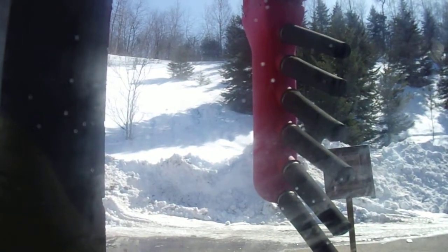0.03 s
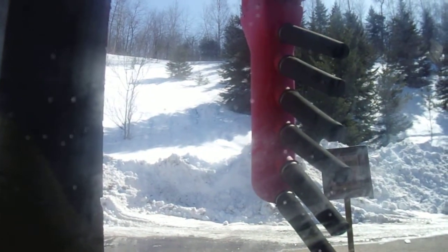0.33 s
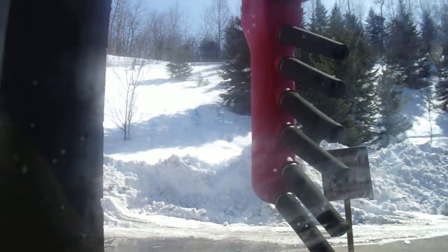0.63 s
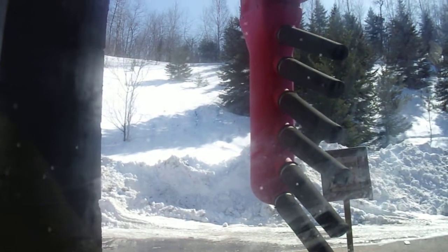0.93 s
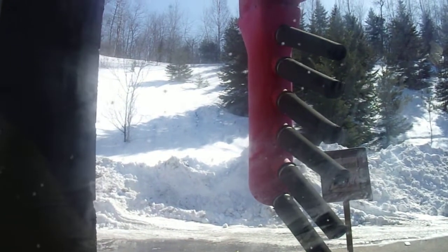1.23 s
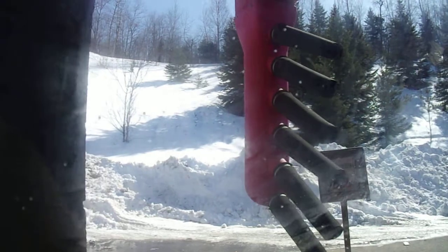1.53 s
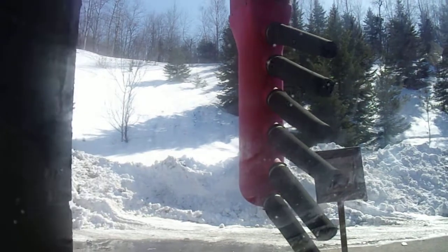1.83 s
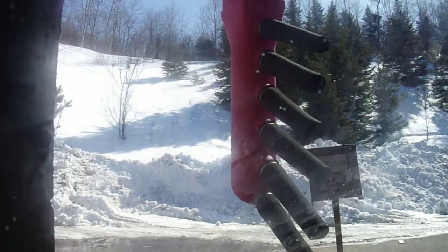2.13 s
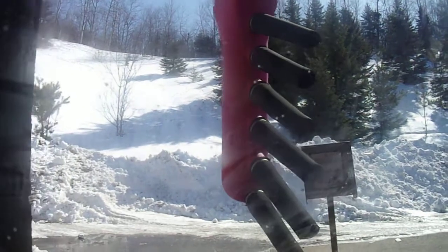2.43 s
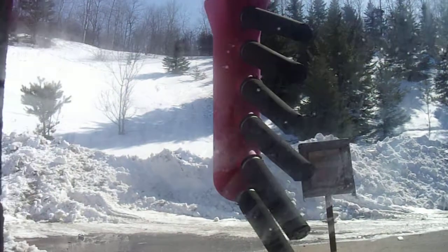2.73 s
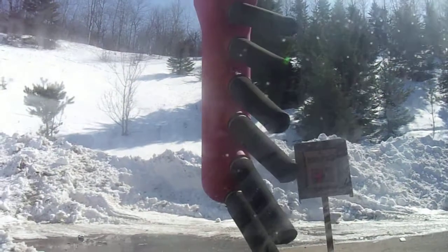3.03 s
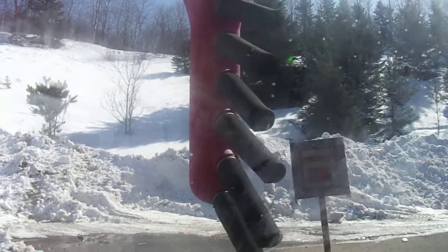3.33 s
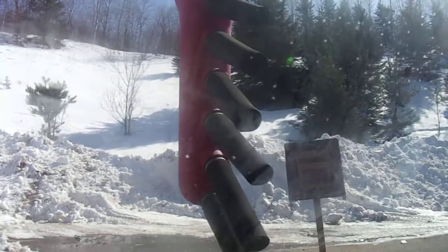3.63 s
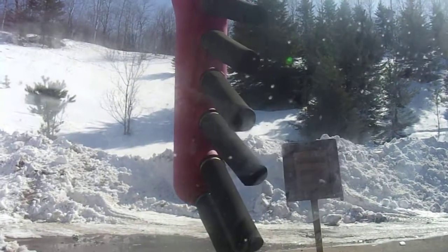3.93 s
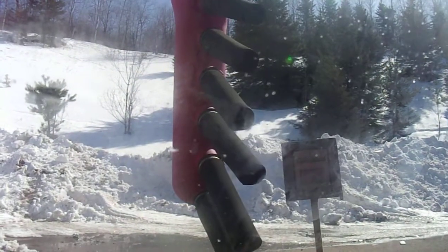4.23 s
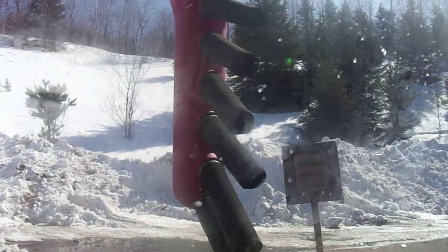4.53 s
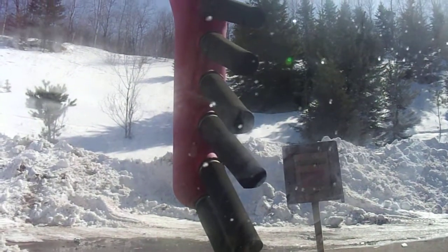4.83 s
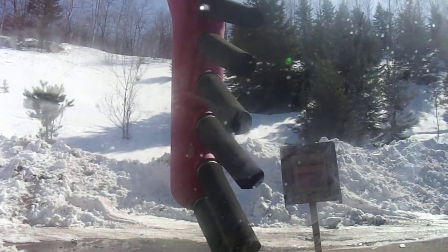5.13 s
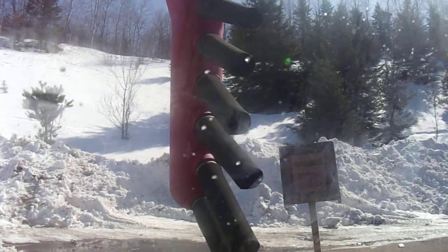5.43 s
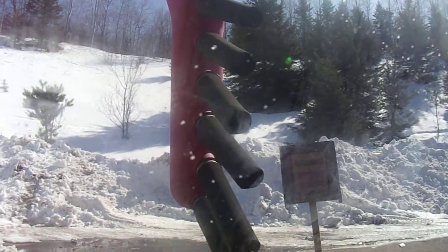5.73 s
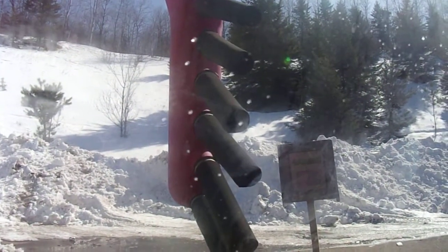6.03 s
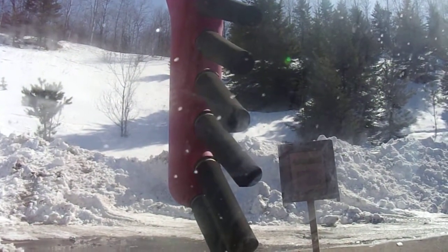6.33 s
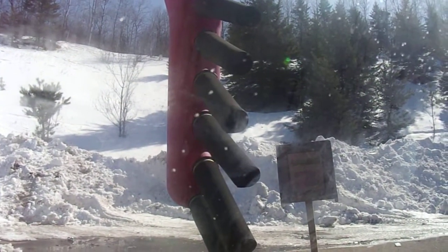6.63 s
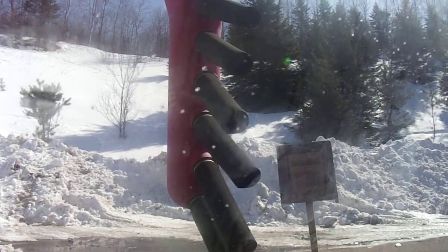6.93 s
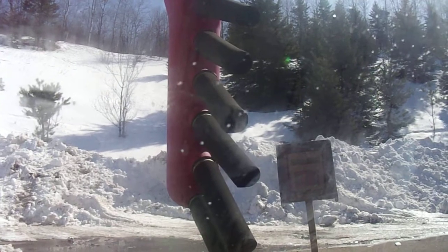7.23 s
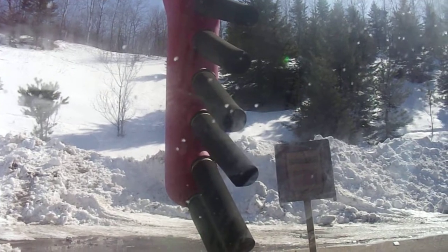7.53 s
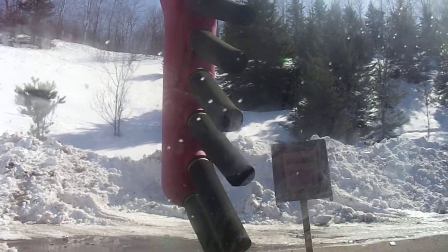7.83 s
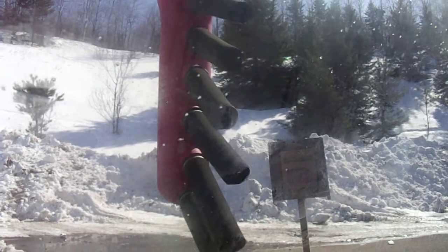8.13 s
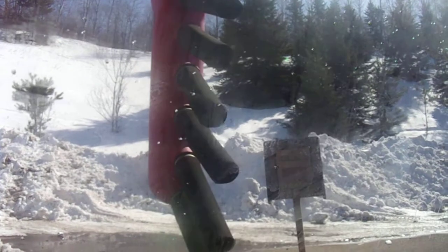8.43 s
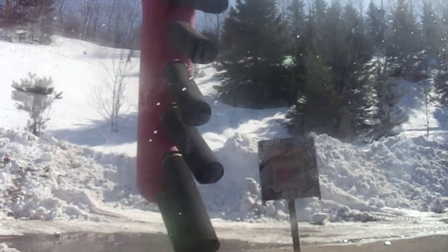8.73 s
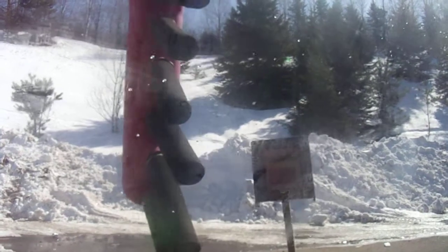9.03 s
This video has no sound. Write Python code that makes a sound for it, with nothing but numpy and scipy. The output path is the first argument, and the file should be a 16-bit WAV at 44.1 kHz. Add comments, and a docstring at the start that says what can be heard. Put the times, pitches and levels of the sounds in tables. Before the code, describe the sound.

Air jets roar and rumble over a car in a car wash dryer, with water drops tapping the roof and spray hissing on glass.

```python
"""Inside a car under the dryer of a car wash. Turbulent air jets drum on the body and roar round it,
while the fan hums behind them. At first heavy drops strike the roof and excite its modes; then the jets
move from the bonnet to the windscreen, whistle in a seal and drive a fine spray over the glass.
A small microphone overloads on the rumble, passes little treble and clicks once."""
import sys
import numpy as np
from scipy import signal
from scipy.fft import rfft, irfft, next_fast_len
from scipy.io import wavfile
from scipy.ndimage import uniform_filter1d, map_coordinates

SR = 44100
rng = np.random.default_rng(int(sys.argv[2]) if len(sys.argv) > 2 else 0)


def transcribe(u):
    """Save the signal u as a 16-bit wav file named by the first command-line argument.

    u: samples, shape (n,) or (channels, n), limited to [-1, 1]; the rate is SR.
    q: integer samples, one column per channel.
    """
    v = np.clip(np.atleast_2d(u).T, -1, 1)
    q = np.round(v * 32767).astype(np.int16)
    wavfile.write(sys.argv[1], SR, q)


N = 410130

# Fan tone and duct resonances. Each row: centre in Hz, half-width in Hz, level in dB with the jets on
# the bonnet, level in dB with the jets on the windscreen.
FAN_TONES = [(524.2, 9, -39.5, -37), (1207, 35, -72, -53.5), (3530, 70, -55.5, -56)]
# Puffs of air through a door seal. Each row: start in seconds, length in seconds, pitch in Hz, level in dB.
SEAL_PUFFS = [(3.57, .15, 1501, -32), (3.72, .28, 1502, -34.5), (4.02, .2, 1563, -48),
              (4.44, .15, 1562, -43.5)]
# Modes of the roof panel. Each row: frequency in Hz, relative level in dB, time to fall 60 dB in seconds.
ROOF_MODES = [(355, 3.5, 0.1), (454, 13, 0.027), (667, 8, 0.047), (800, -6.5, 0.024), (1066, 0, 0.058),
              (1200, -7, 0.034), (1400, -11, 0.036), (1550, -7, 0.062), (1856, -13.5, 0.06),
              (2166, -12, 0.045), (2400, -16.5, 0.0083), (3350, -18, 0.11), (4860, -22.5, 0.026)]
# Heavy drops on the roof. Each row: start in seconds, relative level in dB, relative brightness in dB.
HEAVY_DROPS = [(0.044, -25, -11), (0.055, -23, -22.5), (0.071, -22, -22.5), (0.092, -25, -18),
               (0.099, -17, -18), (0.204, -19.5, -18), (0.232, -24, -15.5), (0.308, -24.0, -17.5),
               (0.382, -24, -14.5), (0.423, -20.5, -18.5), (0.455, -21, -19.5), (0.511, -19.5, -19.5),
               (0.579, -22, -25), (0.602, -22.5, -17.5), (0.63, -23.5, -20.5), (0.66, -22.5, -16.5),
               (0.734, -22.5, -13), (0.749, -28.0, -16), (0.825, -27, -22), (0.869, -27, -15),
               (0.956, -24.5, -17.5), (1.08, -22, -14.5), (1.195, -21.5, -13.5), (1.219, -20.0, -22),
               (1.314, -19, -21.5), (1.378, -20.5, -24), (1.41, -17.0, -26.5), (1.494, -21.5, -15.5),
               (1.524, -23, -16.5), (1.556, -21.5, -14), (1.622, -23.0, -15.5), (1.638, -26, -13.5),
               (1.66, -22, -19.5), (1.711, -26, -22.5), (1.782, -22.5, -15.5), (1.839, -23.5, -26),
               (1.919, -24, -14), (1.961, -19, -14), (2.097, -20, -24), (2.22, -26, -20.5),
               (2.342, -21, -25), (2.766, -28.5, -21.5)]
# Gusts and lulls as the nozzles swing. Each row: middle in seconds, length in seconds, swell in dB.
NOZZLE_GUSTS = [(2.353, .08, 6.5), (2.47, .16, -4), (2.561, 0.05, 8.5), (2.8, .06, 9.5), (2.943, 0.065, 7),
                (3.109, .12, 6), (3.659, .08, 5), (3.879, 0.089, 3.5), (4.41, 0.078, 4.5), (5.065, .11, 4),
                (5.171, .06, -5), (5.353, .07, -6), (5.43, 0.039, 2.5), (5.736, .18, 3.5), (5.96, 0.24, -3),
                (6.158, .13, 4.5), (6.399, 0.088, -5.5), (6.524, .06, 4), (6.648, 0.049, 5),
                (6.865, .06, 5.5), (7.802, 0.071, 3.5), (8.06, 0.065, -7), (8.167, .08, 3.5),
                (8.326, .12, 2), (8.517, .08, -5), (8.667, 0.055, 4), (8.769, .07, -7)]
# The steady rush beneath the gusts. Each row: time in seconds, level in dB.
FLOW_LEVELS = [(0, -25), (1.4, -23), (2.4, -27), (3.4, -27.5), (4.7, -27), (7.6, -26), (9.3, -26)]
# Spectra of the body (jets on the bonnet, then on the windscreen), the spray and the rushing air.
# Each row: frequency in Hz, relative spectral density in dB.
BONNET_SPECTRUM = [(10, -22.5), (25, -16.5), (35, -8), (46, -7.5), (62, 0), (95, -4), (130, 1), (165, -6.5),
                   (250, -10), (300, -18), (500, -52.5)]
WINDSCREEN_SPECTRUM = [(10, -19), (25, -11.5), (45, -4.5), (57, 2), (70, -4.5), (110, -7), (135, -4),
                       (170, -12.5), (255, -16), (300, -22.5), (500, -55)]
SPRAY_SPECTRUM = [(600, -14.5), (1200, 6), (2000, 0), (2800, 1), (3550, 1.5), (4400, -1), (5000, -3.5),
                  (7000, -1)]
ROAR_SPECTRUM = [(110, -23.5), (190, 2.5), (255, 2), (300, -2.5), (350, -1), (460, -2), (620, -7.5),
                 (800, -16), (1100, -20.5), (1500, -33.5), (2500, -35.5), (6000, -44)]

# Gradual changes, each given by its middle and its length in seconds.
ROOF_DRIES, SPRAY_ARRIVES, JETS_CROSS = (2.48, 0.78), (3.5, 0.12), (3.8, 0.45)
CLICK_S = 1.4233
TIME = np.arange(N) / SR


def amp(db):
    """Amplitude ratio for a level in decibels."""
    return 10 ** (np.asarray(db) / 20)


def unit(x):
    """The signal normalised to rms 1."""
    return x / np.sqrt(np.mean(x ** 2) + 1e-20)


def ramp(middle_s, length_s):
    """A linear rise from 0 to 1 around a moment."""
    return np.clip((TIME - middle_s) / length_s + .5, 0, 1)


def wobble(rate):
    """Smooth random modulation: a spline through rate Gaussian values a second."""
    return map_coordinates(rng.standard_normal(int(N * rate / SR) + 4), [np.arange(N) * rate / SR])


def gain_at(spectrum, hz):
    """Gain from (Hz, dB) points, interpolated on a logarithmic frequency axis."""
    knots_hz, db = np.transpose(spectrum)
    return amp(np.interp(np.log(hz + 1), np.log(knots_hz + 1), db))


def filtered(x, response):
    """Linear filtering: the spectrum is multiplied by a frequency response."""
    size = next_fast_len(N + SR // 2)
    return irfft(rfft(x, size) * response(np.fft.rfftfreq(size, 1 / SR)), size)[:N]


def coloured(x, spectrum):
    """Spectral shaping by (Hz, dB) points, at rms 1."""
    return unit(filtered(x, lambda hz: gain_at(spectrum, hz)))


def band(x, low_hz, high_hz):
    """A steep causal band-pass filter."""
    return signal.sosfilt(signal.butter(4, [low_hz, high_hz], "bandpass", fs=SR, output="sos"), x)


def turbulence(spectrum, patchy_db):
    """Turbulent noise of rms 1, its gain varying in random patches of time and frequency."""
    cells = signal.stft(rng.standard_normal(N), nperseg=512)[2]
    patches = uniform_filter1d(rng.standard_normal(cells.shape), size=7, axis=0)
    patches = unit(uniform_filter1d(patches, size=12, axis=1))
    noise = signal.istft(cells * amp(patchy_db * patches), nperseg=512)[1][:N]
    return coloured(noise, spectrum)


def impacts(rate, spread_db):
    """Shot noise: independent impulses of uneven size, on average rate a second."""
    hits = rng.random(N) < rate / SR
    sizes = amp(spread_db * np.clip(rng.standard_normal(N), -2, 2))
    return hits * sizes * rng.choice([-1, 1], N)


def click():
    """Exponential relaxation: a step that dies away at once is heard as a bright tick."""
    t = TIME - CLICK_S
    return .62 * (t >= 0) * np.exp(-np.abs(t) / .0007)


def fan(on_glass):
    """Narrow-band noise: the impeller and its duct resonances sound as unsteady tones."""
    out = np.zeros(N)
    for centre, width, bonnet_db, glass_db in FAN_TONES:
        tone = unit(filtered(rng.standard_normal(N), lambda hz: 1 / (1 + ((hz - centre) / width) ** 2)))
        out += amp(bonnet_db + (glass_db - bonnet_db) * on_glass) * tone
    return out


def seal_whistle(attack_s=0.054, release_s=0.041, sag_db_per_s=38):
    """Flow-excited oscillation: a jet grazing a seal sings in puffs, the later ones weaker and higher."""
    out = np.zeros(N)
    waver = 1 + 0.0038 * wobble(120)
    tremble = amp(wobble(40))
    for start, length, hz, db in SEAL_PUFFS:
        t = np.maximum(TIME - start, 0)
        gate = np.clip(np.minimum(t / attack_s, (length - t) / release_s), 0, 1)
        tone = np.sqrt(2) * np.sin(2 * np.pi * np.cumsum(hz * waver) / SR)
        out += gate * amp(db - sag_db_per_s * t) * tone
    return tremble * out


def drop_impact(bright_db):
    """Impact excitation: a drop smacks the roof, splashes and sets the damped panel modes ringing."""
    t = np.arange(SR // 10) / SR
    hz, db, t60 = np.transpose(ROOF_MODES)[:, :, None]
    strength = amp(db + 2 * rng.standard_normal(hz.shape)) * rng.choice([-1, 1], hz.shape)
    pitch = hz * (1 + .008 * rng.standard_normal(hz.shape))
    ring = amp(-2) * np.sum(strength * amp(-60 * t / t60) * np.sin(2 * np.pi * pitch * t), axis=0)
    blow = t == 0
    spreading_water = 0.015 * amp(-60 * t / 0.012) * rng.standard_normal(len(t))
    smack = amp(29) * band(blow + spreading_water, low_hz=500, high_hz=2350)
    splash_noise = unit(band(rng.standard_normal(len(t)), low_hz=2680, high_hz=6455))
    splash = amp(bright_db + 8 - 60 * t / 0.024) * splash_noise
    # Bending waves are dispersive: the treble reaches the cabin first.
    dispersion = np.exp(-2j * np.pi * np.sqrt(np.fft.rfftfreq(len(t), 1 / SR) / 130))
    drop = irfft(rfft(ring + smack + splash) * dispersion, len(t))
    return drop / np.sqrt(np.mean(drop[t < .004] ** 2))  # rms 1 over the first 4 ms


def roof_drops(roof_wet, patter_db=-33.5):
    """Superposed impacts: heavy drops fall among a lighter patter that fades as the roof is blown dry."""
    patter = sum(signal.fftconvolve(impacts(rate=9, spread_db=3.5), drop_impact(bright_db=-11))[:N]
                 for _ in range(6))
    heavy = np.zeros(N + SR)
    for start, db, bright_db in HEAVY_DROPS:
        drop = amp(db + 1) * drop_impact(bright_db + 2.5)
        heavy[round(start * SR):][:len(drop)] += drop
    return heavy[:N] + amp(patter_db) * roof_wet * unit(patter)


def gusts(eddy_db=0.28):
    """Unsteady flow modulates the level, in dB: bell-shaped gusts and lulls over small eddies."""
    bells = sum(db * np.exp(-(2 * (TIME - middle) / length) ** 2) for middle, length, db in NOZZLE_GUSTS)
    return bells + eddy_db * wobble(14)


def glass_spray(swell_db, flutter, roof_wet):
    """Hiss and shot noise of droplets swept over the glass, louder and gustier once the glass is wet."""
    glass_wet = ramp(*SPRAY_ARRIVES)
    shake_db = (0.49 + .6 * glass_wet) * (0.56 * swell_db + 1.6 * flutter)
    run_off_db = 1.5 * roof_wet  # water running off the roof adds to the spray
    gain_db = -44.5 + 6 * glass_wet + shake_db + run_off_db
    hiss = amp(1) * turbulence(SPRAY_SPECTRUM, patchy_db=1.5)
    droplets = amp(-5) * coloured(impacts(rate=900, spread_db=4), SPRAY_SPECTRUM)
    return amp(gain_db) * (hiss + droplets)


def air_roar(swell_db, flutter, flutter_db=1.16, grit_db=1.97):
    """Aerodynamic noise: air rushing round the car swells with the gusts and is roughened by eddies."""
    flow_db = np.interp(TIME, *np.transpose(FLOW_LEVELS))
    level_db = flow_db + swell_db + flutter_db * flutter + grit_db * wobble(90)
    return amp(level_db) * turbulence(ROAR_SPECTRUM, patchy_db=0.4)


def body_rumble(swell_db, on_glass, level_db=-13):
    """Forced vibration: the jets buffet the body, their power shared between bonnet and windscreen."""
    bonnet = np.sqrt(1 - on_glass) * turbulence(BONNET_SPECTRUM, patchy_db=1.0)
    windscreen = np.sqrt(on_glass) * turbulence(WINDSCREEN_SPECTRUM, patchy_db=.5)
    return amp(level_db + .12 * swell_db) * (bonnet + windscreen)


def jets(on_glass, roof_wet):
    """Common modulation: the same gusts drive the rumble, the roar and the spray."""
    swell_db = gusts()
    flutter = np.maximum(wobble(35), -1.3)  # eddies shake roar and spray together, never stopping the flow
    rumble = body_rumble(swell_db, on_glass)
    return rumble + air_roar(swell_db, flutter) + glass_spray(swell_db, flutter, roof_wet)


def scene():
    """Superposition of all the sources at the front seat."""
    spill = np.clip(0.074 * TIME, 0, 1)  # share of the air that reaches the glass ahead of the jets
    on_glass = np.maximum(spill, ramp(*JETS_CROSS))
    roof_wet = 1 - ramp(*ROOF_DRIES)
    return (jets(on_glass, roof_wet) + fan(on_glass) + seal_whistle() + roof_drops(roof_wet))[None]


def record(dry, treble_hz=6200, top_hz=16000):
    """Saturation and band limiting: the rumble's peaks are flattened, the treble is cut, a tick is added."""
    clipped = np.clip(dry[0], -.405, .385)
    roll_off = [(4900, 0.0), (5300, -6.5), (5700, -14.5), (6100, -31.0)]  # frequency in Hz, gain in dB
    dull = filtered(clipped, lambda hz: gain_at(roll_off, hz) * (hz < treble_hz))
    ticked = dull - np.sign(dull[round(CLICK_S * SR)]) * click()  # it snaps against the swing of the wave
    low_pass = signal.ellip(10, .1, 90, top_hz, fs=SR, output="sos")
    return signal.sosfilt(low_pass, ticked)[None]


dry = scene()
out = record(dry)
transcribe(out)
```